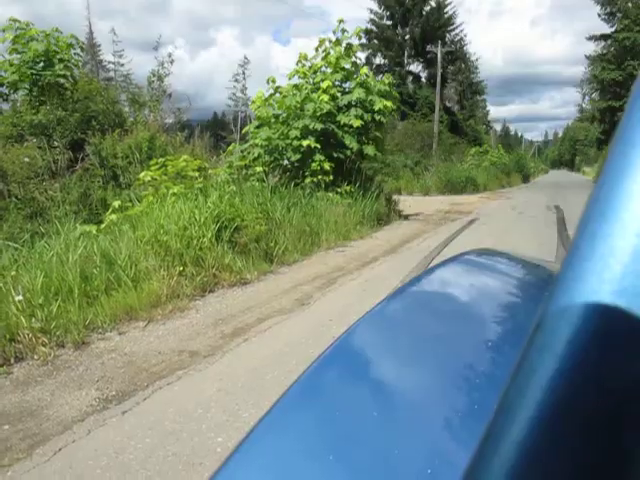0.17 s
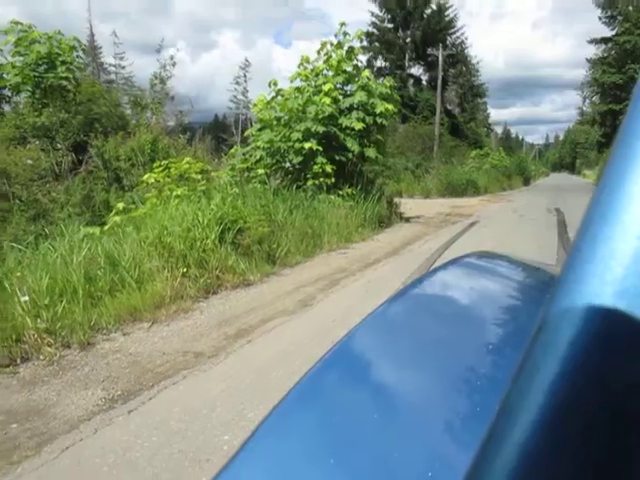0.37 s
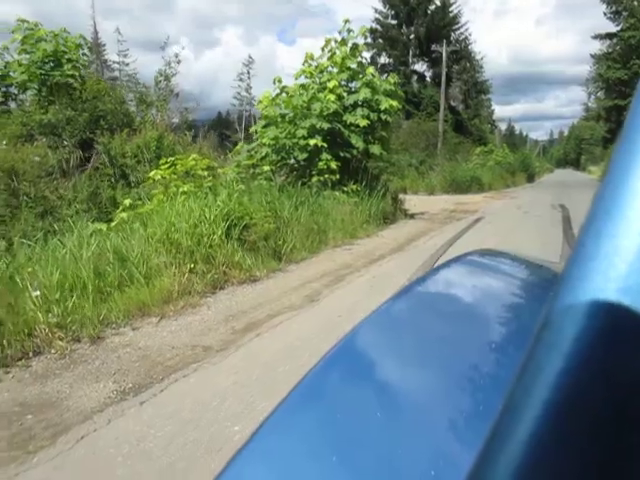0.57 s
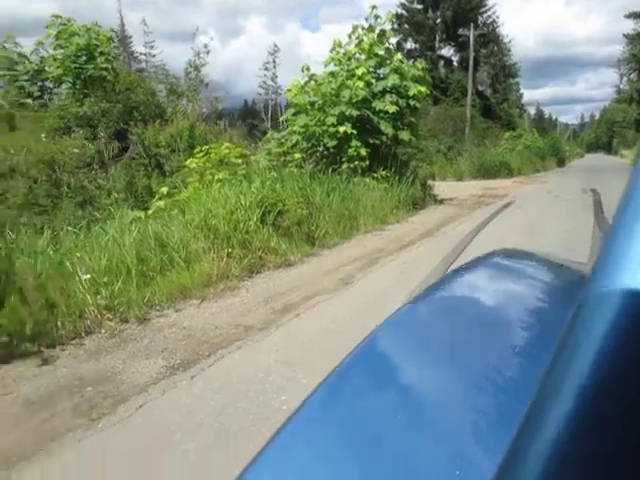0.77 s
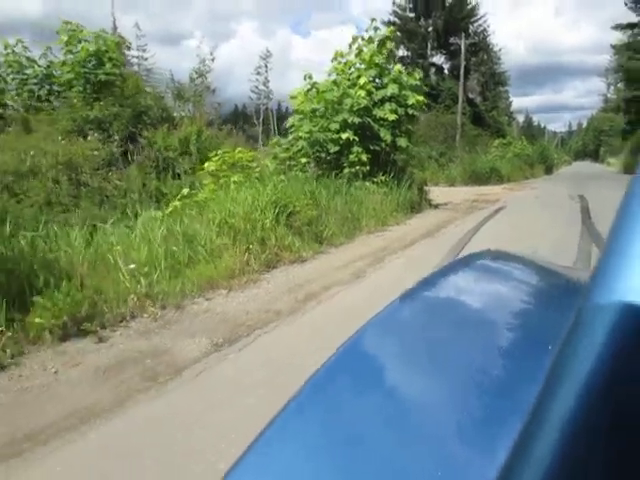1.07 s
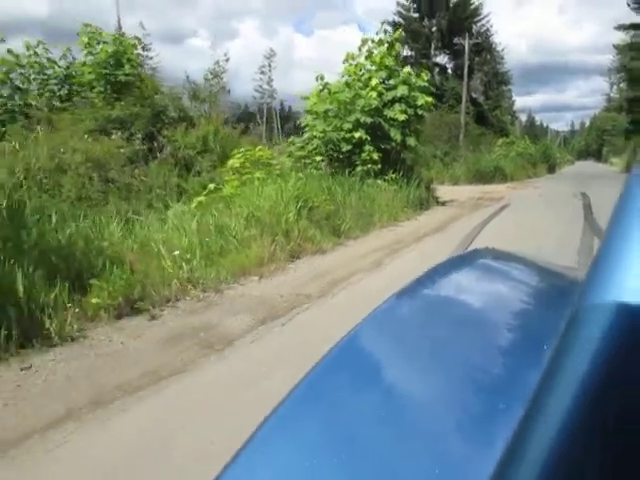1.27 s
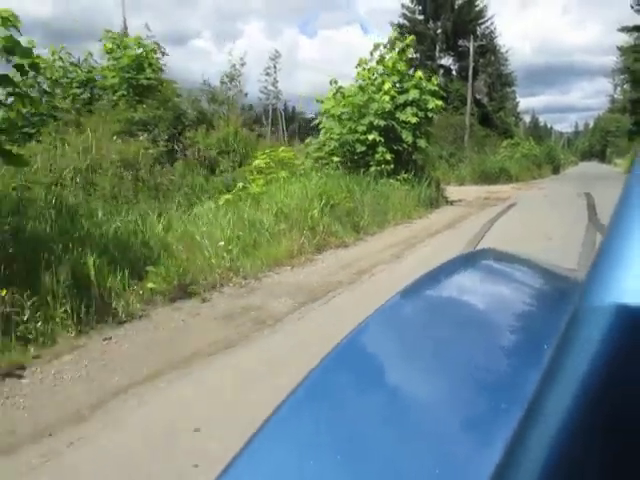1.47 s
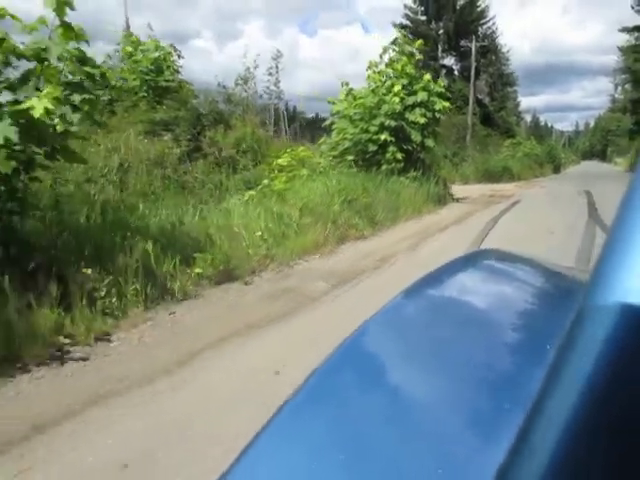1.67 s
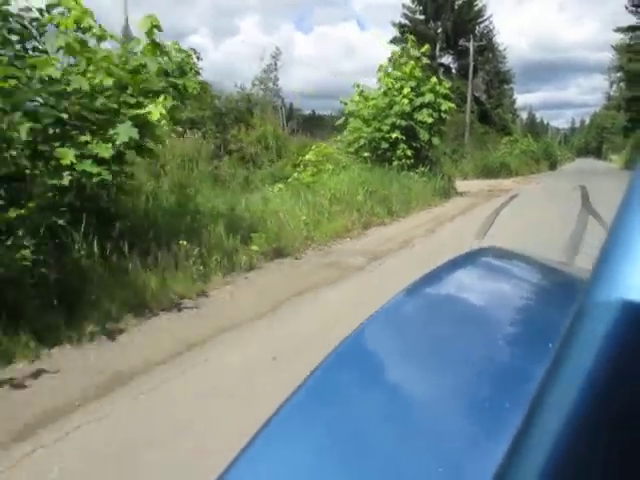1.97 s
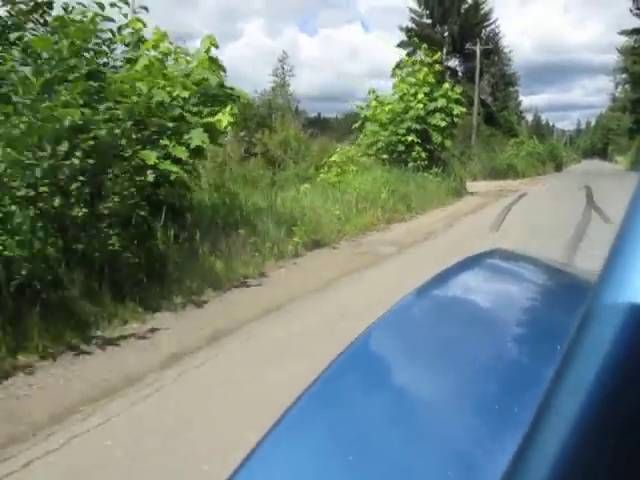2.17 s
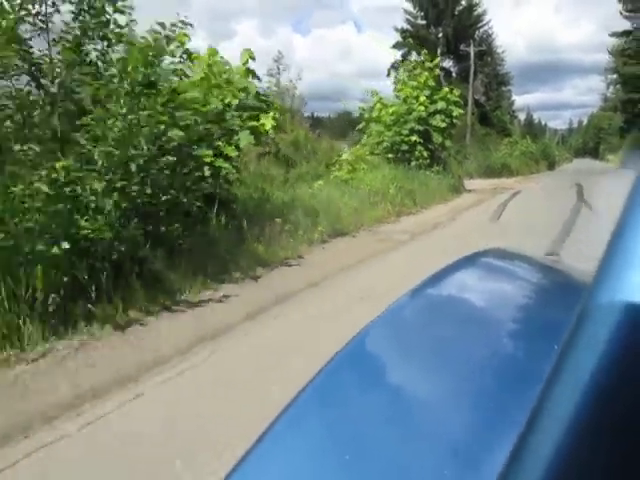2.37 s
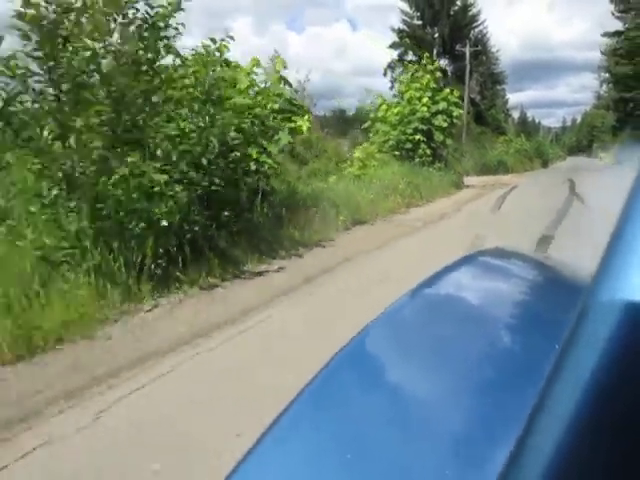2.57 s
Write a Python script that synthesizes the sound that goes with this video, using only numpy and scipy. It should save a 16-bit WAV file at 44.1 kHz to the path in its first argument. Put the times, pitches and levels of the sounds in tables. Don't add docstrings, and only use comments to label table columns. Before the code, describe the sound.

A car engine coasts with a low, sinking burble and dull metallic knocks, then is floored, climbing quickly to a raspy howl that stutters and holds, with faint tyre squeal and road hiss, heard close at an open window.

```python
import sys
import numpy as np
from scipy import signal
from scipy.io import wavfile
from scipy.ndimage import uniform_filter1d

SR = 44100
rng = np.random.default_rng(int(sys.argv[2]) if len(sys.argv) > 2 else 0)


def to_wav(s):
    ch = np.atleast_2d(s).T
    pcm = np.round(np.clip(ch, -1, 1) * 32767)
    wavfile.write(sys.argv[1], SR, pcm.astype(np.int16))


def makeup_ratio(level_db):
    decades = np.asarray(level_db, float) / 20
    return 10 ** decades


N = 119511


def at_hz(points, hz):
    freqs, levels = np.array(points).T
    return np.interp(np.log(hz), np.log(freqs), levels)


def rms_one(x):
    return x / np.sqrt(np.mean(x ** 2) + 1e-20)


def in_time(rows):
    times, *columns = np.transpose(rows)
    return [np.interp(np.arange(N) / SR, times, column) for column in columns]


def spans(rows, ramp):
    t = np.arange(N) / SR
    inside = sum((t > row[0]) * (t < row[1]) * 1. for row in rows)
    return uniform_filter1d(inside, size=ramp)


def drift(rate):
    step = 40
    pole = np.exp(-2 * np.pi * rate * step / SR)
    white = rng.standard_normal(N // step + 2002)
    slow = signal.lfilter([1], [1, -2 * pole, pole * pole], white)[2000:]
    return np.interp(np.arange(N) / step, np.arange(len(slow)), rms_one(slow))


def resonate(x, hz, width_hz):
    r = np.exp(-np.pi * width_hz / SR)
    poles = [1, -2 * r * np.cos(2 * np.pi * hz / SR), r * r]
    return signal.lfilter([(1 - r * r) / 2, 0, (r * r - 1) / 2], poles, x)


def banded(spectrum, patchy_db):
    lowest, highest = spectrum[0][0], spectrum[-1][0]
    edges = lowest * 2 ** np.arange(0, np.log2(highest / lowest) + 1 / 3, 1 / 3)
    together, white = drift(20.0), rng.standard_normal((2, N))
    out = 0
    for k, (low, high) in enumerate(zip(edges, edges[1:])):
        third_octave = signal.butter(2, [low, high], "band", fs=SR, output="sos")
        band = signal.sosfilt(third_octave, white[k % 2])
        flicker_db = patchy_db * (0.4 * together + drift(11))
        out = out + band * makeup_ratio(at_hz(spectrum, np.sqrt(low * high)) + flicker_db)
    return rms_one(out)


def bump(turn, centre, width):
    return np.exp((np.cos(2 * np.pi * (turn - centre)) - 1) / (2 * np.pi * width) ** 2)


# (multiple of cycle rate [1], level [dB])
COASTING_ORDERS = [(1, -31), (2, -19), (3, 0), (4, -11), (5, 0), (6, -16), (7, -22), (8, -9), (9, -25),
                   (10, -17), (11, -11), (12, -18), (13, -17), (14, -22), (15, -20), (16, -14), (17, -19),
                   (18, -22), (19, -16)]
BITING_ORDERS = [(1, -32), (2, -19), (3, -12), (4, -20), (5, 4), (6, -20), (7, -19), (8, -4), (9, -19),
                 (10, -10), (11, -21), (12, -23), (13, -9), (14, -25), (15, -20), (16, -18), (17, -23),
                 (18, -19), (19, -24)]
PULLING_ORDERS = [(1, -28), (2, -20), (3, -5), (4, -14), (5, 1), (6, -25), (7, -24), (8, -6), (9, -15),
                  (10, -12), (11, -19), (12, -21), (13, -7), (14, -17), (15, -18), (16, -16), (17, -21),
                  (18, -16), (19, -21)]
STRAINING_ORDERS = [(1, -19), (2, -15), (3, -2), (4, -18), (5, -3), (6, -13), (7, -15), (8, -7.5),
                    (9, -15.5), (10, -7), (11, -2.5), (12, -1), (13, -5), (14, -8), (15, -15), (16, -8.5),
                    (17, -22), (18, -10), (19, -4)]
CLIMBING_ORDERS = [(1, -18), (2, -18), (3, -1), (4, -12), (5, -5), (6, -11), (7, -22), (8, -1), (9, -12),
                   (10, -9), (11, -4), (12, -15), (13, -9), (14, -9), (15, -21), (16, -15), (17, -17),
                   (18, -13), (19, -19)]
HOWLING_ORDERS = [(1, -19), (2, -20), (3, -2), (4, -11), (5, -8), (6, -9), (7, -25), (8, -2), (9, -7),
                  (10, 0), (11, -7), (12, -29), (13, -2), (14, -14), (15, -19), (16, -15), (17, -13),
                  (18, -21), (19, -21)]
MISSING_ORDERS = [(1, -10), (2, -11), (3, -3), (4, -4), (5, -23), (6, -1), (7, -9), (8, -2), (9, -6),
                  (10, -9), (11, 0), (12, -25), (13, -9), (14, -17), (15, -15), (16, -17), (17, -18),
                  (18, -22), (19, -23)]
STATE_HZ = [25.7, 33, 39.5, 43.5, 45.6]


def order_gain(k, hz, opened, miss):
    states = (BITING_ORDERS, PULLING_ORDERS, STRAINING_ORDERS, CLIMBING_ORDERS, HOWLING_ORDERS)
    driven_db = np.interp(hz, STATE_HZ, [orders[k - 1][1] for orders in states])
    db = opened * driven_db + (1 - opened) * COASTING_ORDERS[k - 1][1]
    return makeup_ratio(db + miss * (MISSING_ORDERS[k - 1][1] - db))


BEATS = [0, 2, 5]
BEAT_STRENGTHS = [1, 1, 2.5]
# (cycle rate [1/s], shift [rad])
PIPE_SHIFT = [(33, .1), (43.5, .65), (45, 1.75)]


def beat_phase(k, hz, opened):
    beats = np.exp(-2j * np.pi * k * np.array(BEATS) / 8)
    strengths = BEAT_STRENGTHS if k < 7 else np.ones(3)
    from_third = k - 3
    coast = np.angle(beats @ strengths) - 1.0 + 1.8 * from_third
    pull = np.angle(beats.sum()) + 1.6 + np.interp(hz, *np.transpose(PIPE_SHIFT)) * from_third
    return np.angle((1 - opened) * np.exp(1j * coast) + opened * np.exp(1j * pull))


# (start [s], end [s])
MISFIRES = [
    (1.355, 1.62),
    (1.63, 1.65),
    (1.81, 1.885),
    (1.92, 2),
]
# (start [s], end [s])
UNSTEADY = [
    (.3, 0.32),
    (.98, 1.16),
    (1.58, 2.02),
]


def exhaust(hz, turn):
    throttle_s, throttle_rise_s = 0.34, 0.049
    pipe_hz, pipe_width_hz = 470, 68
    wander_db, wander_rad, wander_per_s = 1.0, 0.13, 12
    stumble_rad = 2.04
    t = np.arange(N) / SR
    opened = np.clip((t - throttle_s) / throttle_rise_s + 0.5, 0, 1)
    miss, shaky = spans(MISFIRES, ramp=400), spans(UNSTEADY, ramp=2000)
    out, power = 0, 0
    for k in range(1, len(HOWLING_ORDERS) + 1):
        high = max(k - 8, 0)
        gain = order_gain(k, hz, opened, miss) * makeup_ratio(-0.6 * high * shaky)
        rough = (1 + 2.0 * shaky) * (1 + 0.12 * high)
        pipe_lag = np.pi / 2 + np.arctan((k * hz - pipe_hz) / pipe_width_hz)
        lag = pipe_lag + stumble_rad * miss * rng.uniform(-0.77, 1)
        swell = makeup_ratio(wander_db * (0.5 + shaky) * drift(wander_per_s))
        jitter = wander_rad * rough * drift(wander_per_s)
        phase = 2 * np.pi * k * turn + beat_phase(k, hz, opened) - lag + jitter
        out = out + gain * swell * np.cos(phase)
        power = power + gain ** 2 / 2
    return out / np.sqrt(power)


# (frequency [Hz], density [dB per Hz])
RUMBLE_SPECTRUM = [(22, -34), (45, -3.5), (139, -4), (314, -8), (477, -2), (1000, -14), (1300, -45),
                   (2200, -120)]


def rumble():
    return makeup_ratio(-13) * banded(RUMBLE_SPECTRUM, patchy_db=1.0)


# (frequency [Hz], density [dB per Hz])
ROAR_SPECTRUM = [(380, -50), (650, -4), (1080, -1.5), (1190, 0.5), (2130, -7.5), (4000, -32), (5200, -49),
                 (8800, -120)]
# (frequency [Hz], width [Hz], level [dB])
RESONANCES = [(1454, 185, -13), (1728, 130, -13.5), (2095, 87, -13.5), (3100, 350, -17.5)]
PUFF_TURN = 0.34


def roar(turn):
    bark = 0.35
    strength = makeup_ratio(1.65 * drift(78))
    beats = sum(bump(turn, beat / 8 + 0.075, 0.089) for beat in BEATS)
    gate = 1 - bark + bark * 2 * strength * beats
    gate = gate + 0.63 * strength * bump(turn, PUFF_TURN, 0.051)
    white = gate * rng.standard_normal(N)
    rings = 0
    for hz, width_hz, db in RESONANCES:
        ring = resonate(resonate(white, hz, width_hz), hz, width_hz)
        rings = rings + makeup_ratio(db) * rms_one(ring)
    return rms_one(gate * banded(ROAR_SPECTRUM, patchy_db=1.06) + rings)


# (start [s], end [s], frequency [Hz], level [dB])
SQUEAL = [
    (0.664, 0.92, 1041, -27.5),
    (0.966, 1.357, 1082, -33),
    (1.414, 2.02, 1042, -34.5),
    (2.036, 2.75, 1079, -30.5),
]


def squeal():
    width_hz, octave_db = 63, -7.5
    t = np.arange(N) / SR
    in_phase, quadrature, octave = drift(width_hz / 2), drift(width_hz / 2), drift(width_hz)
    out = 0
    for start_s, end_s, hz, db in SQUEAL:
        phase = 2 * np.pi * hz * t
        tone = in_phase * np.cos(phase) + quadrature * np.sin(phase)
        tone = tone + makeup_ratio(octave_db) * octave * np.cos(2 * phase)
        out = out + spans([(start_s, end_s)], ramp=1500) * makeup_ratio(db) * tone
    return out


# (time [s], peak level [dB], frequency [Hz], t60 [s])
TICKS = [(.3385, -33, 4100, .03), (.339, -37, 5000, 0.023), (.3395, -33, 7160, .015),
         (.340, -37, 9940, 0.051), (.351, -35, 4200, 0.027), (1.488, -15.5, 2130, 0.037),
         (1.533, -26, 2800, .025), (1.554, -24, 3100, 0.026), (1.833, -24, 2750, .03),
         (1.898, -19.5, 3130, 0.028), (.165, -19, 460, 0.12), (.203, -20, 456, .1),
         (.243, -16.5, 450, 0.11), (.286, -12.5, 460, 0.092), (.326, -15, 471, 0.13), (.35, -11, 432, .08),
         (2.4375, -13, 710, .025), (2.459, -18, 625, 0.02)]


def ticks():
    out, t = np.zeros(N + SR), np.arange(4000) / SR
    for s, db, hz, t60 in TICKS:
        start = int(s * SR)
        rise = 1 - np.exp(-t * hz / 0.74)
        out[start:start + 4000] += makeup_ratio(db - 60 * t / t60) * rise * np.sin(2 * np.pi * hz * t)
    return out[:N]


# (time [s], peak level [dB])
RASPS = [(0.3382, -21.5), (0.75, -19), (0.7816, -13), (0.9773, -22), (1.0545, -15), (1.269, -32),
         (1.291, -25), (1.3125, -30), (1.381, -19), (1.4024, -21), (1.4238, -18), (1.4442, -30),
         (1.4667, -18), (1.5103, -16.5), (1.5335, -20), (1.5555, -30), (1.577, -28), (1.6225, -17),
         (1.641, -15), (1.8345, -25), (1.856, -25), (1.8982, -17.5), (1.9187, -23), (1.9406, -18),
         (1.9625, -21), (1.985, -24), (2.3103, -20), (2.3534, -19), (2.3966, -24), (2.4155, -26),
         (2.4614, -19), (2.6151, -20)]


def rasps():
    level_db, t60_s, rise_s = -2, 0.02, 0.0015
    band = signal.butter(1, [1400, 4200], "band", fs=SR, output="sos")
    out, t = np.zeros(N + SR), np.arange(4000) / SR
    for s, db in RASPS:
        start = int(s * SR)
        burst = rms_one(signal.sosfilt(band, rng.standard_normal(4000)))
        envelope = makeup_ratio(db + level_db - 60 * t / t60_s) * (1 - np.exp(-t / rise_s))
        out[start:start + 4000] += envelope * burst
    return out[:N]


# (frequency [Hz], density [dB per Hz])
HISS_SPECTRUM = [(1600, -37), (2600, -1.5), (4000, -2.5), (6500, -7.5), (9500, -4), (11500, -7.5),
                 (13000, -11.5), (16000, -18.5)]


def hiss(turn):
    scatter = makeup_ratio(4.5 * drift(17))
    puff = 0.37 * scatter * bump(turn, PUFF_TURN, 0.1)
    return rms_one((1 + puff) * banded(HISS_SPECTRUM, patchy_db=1.0))


# (time [s], cycle rate [1/s])
ENGINE = [(.08, 26.47), (.25, 23.61), (.35, 22.6), (.42, 23.7), (.5, 27.07), (.6, 31.72), (.66, 33.08),
          (.76, 32.74), (.91, 36.17), (1.03, 39.31), (1.2, 42.88), (1.31, 44.4), (1.6, 46.38), (1.8, 46.92),
          (2.0, 47.08), (2.17, 45.61), (2.44, 46.13), (2.71, 45)]
# (time [s], level [dB])
NOTE = [(0.08, -16.5), (0.36, -16), (0.45, -14), (0.52, -16.5), (0.7, -15.5), (0.91, -19.5), (0.93, -18),
        (1.89, -19), (1.96, -21), (2.01, -17.5), (2.42, -18), (2.47, -16.5), (2.51, -19), (2.71, -18)]
# (time [s], roar level [dB], hiss level [dB])
LOAD = [(.08, -39, -46), (.42, -40.5, -47.5), (.48, -35, -43.5), (.67, -31.5, -39), (1.0, -27, -36.5),
        (1.4, -27, -33), (1.95, -27, -35), (2.1, -28, -37), (2.71, -27.5, -38)]


def scene():
    (hz,), (note_db,), (roar_db, hiss_db) = in_time(ENGINE), in_time(NOTE), in_time(LOAD)
    turn = 0.145 + np.cumsum(hz) / SR
    mix = makeup_ratio(note_db) * (exhaust(hz, turn) + rumble())
    mix = mix + makeup_ratio(roar_db + 2) * roar(turn)
    mix = mix + squeal() + ticks() + rasps()
    mix = mix + makeup_ratio(hiss_db + 1.5) * hiss(turn)
    return mix[None, :]


def top_cut(x):
    return signal.sosfilt(signal.butter(12, 15720, fs=SR, output="sos"), x)


def record(dry):
    start_s, gap_hz, top_hz, top_db = 0.07, 11740, 15700, -10
    x = dry * np.clip((np.arange(N) / SR - start_s) / 0.0007, 0, 1)
    main_band = signal.cheby2(12, 40, gap_hz, fs=SR, output="sos")
    top_band = signal.cheby2(10, 40, [gap_hz, top_hz + 300], "band", fs=SR, output="sos")
    droop = signal.butter(3, 13700, fs=SR, output="sos")
    low = signal.sosfilt(main_band, x)
    top = signal.sosfilt(droop, signal.sosfilt(top_band, x))
    return top_cut(low + makeup_ratio(top_db) * top)


dry = scene()
out = record(dry)
to_wav(out)
```